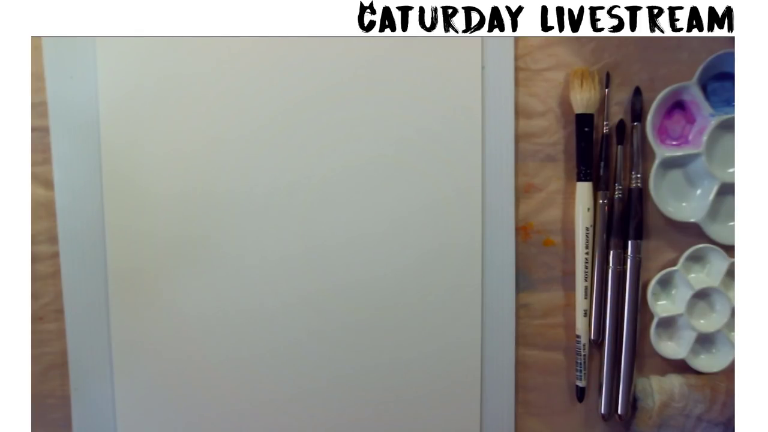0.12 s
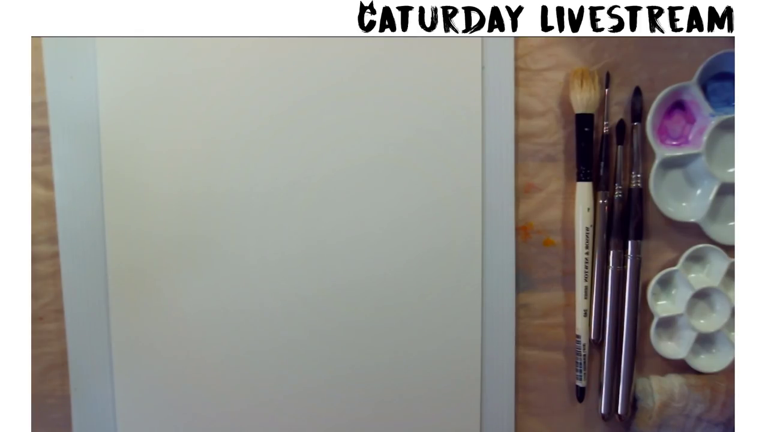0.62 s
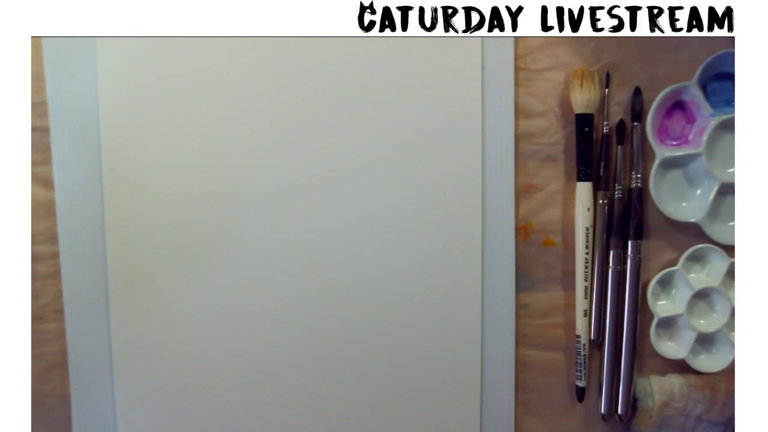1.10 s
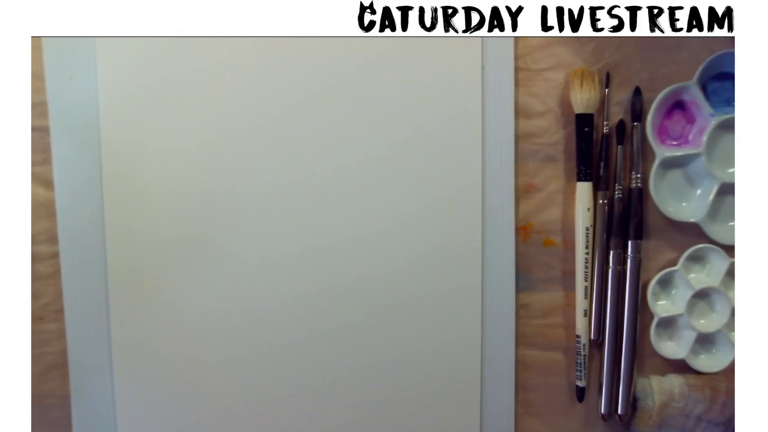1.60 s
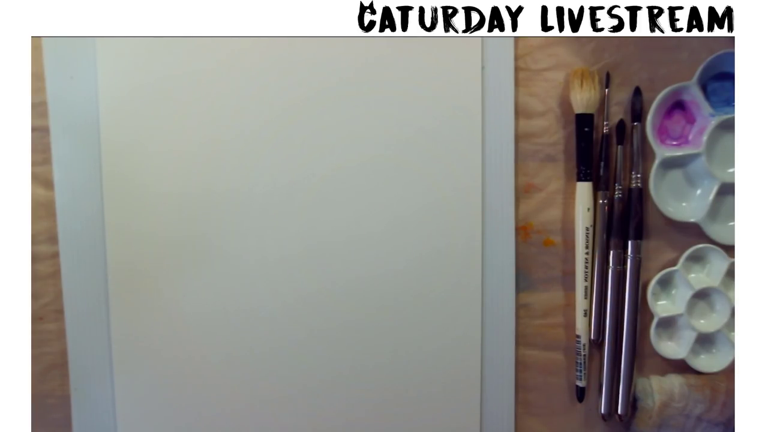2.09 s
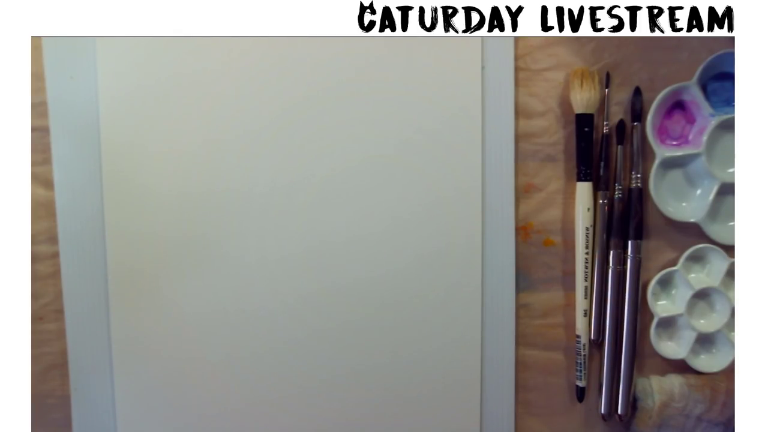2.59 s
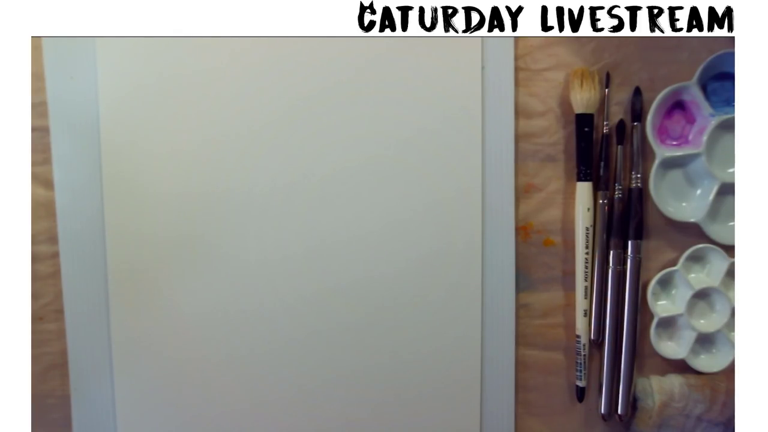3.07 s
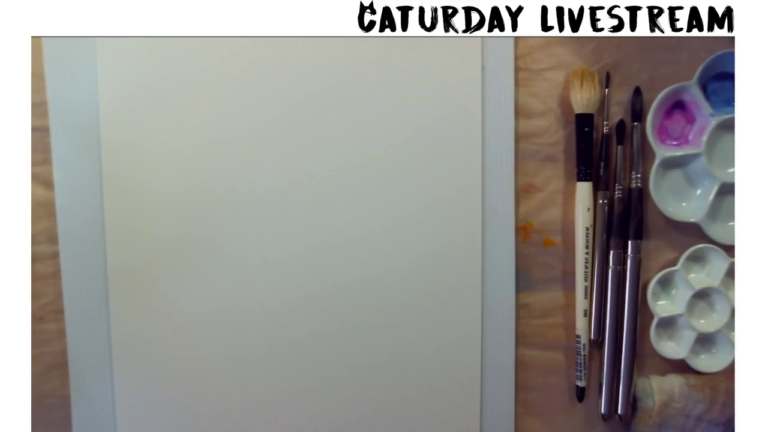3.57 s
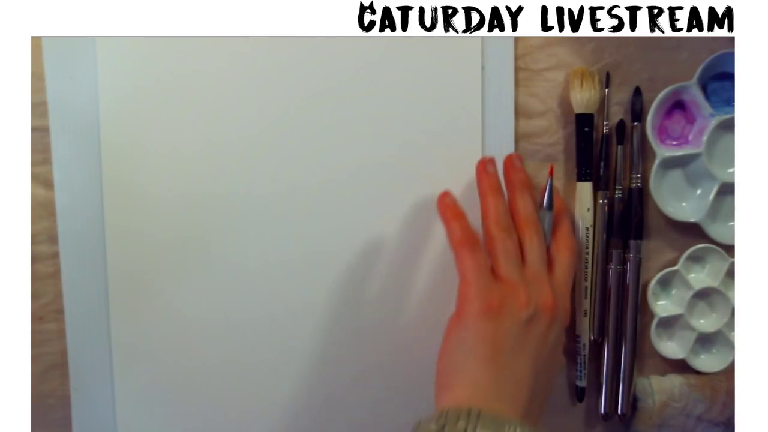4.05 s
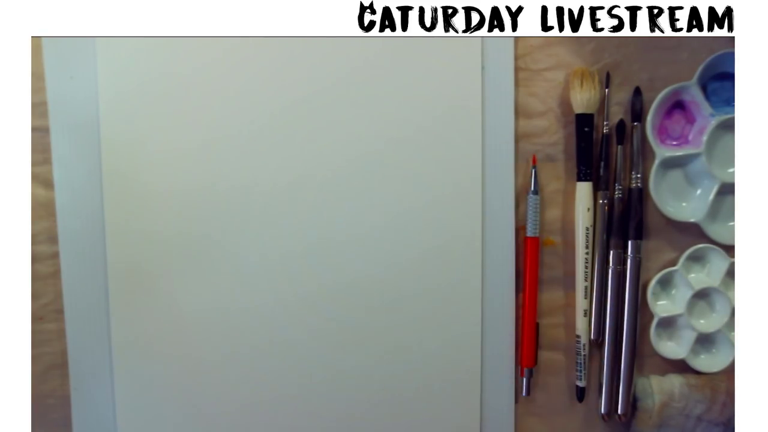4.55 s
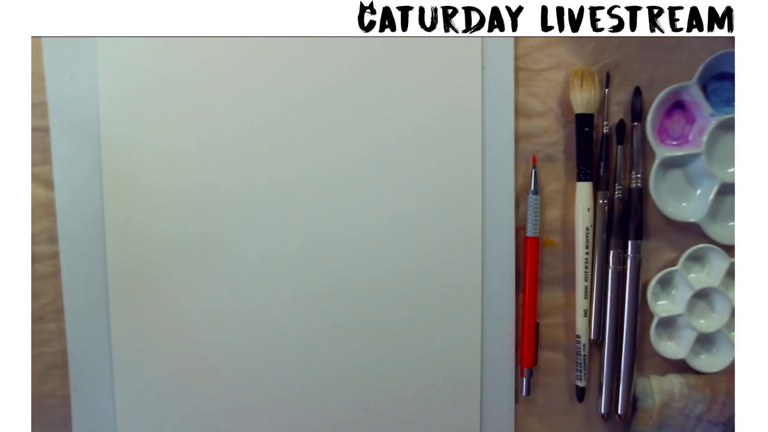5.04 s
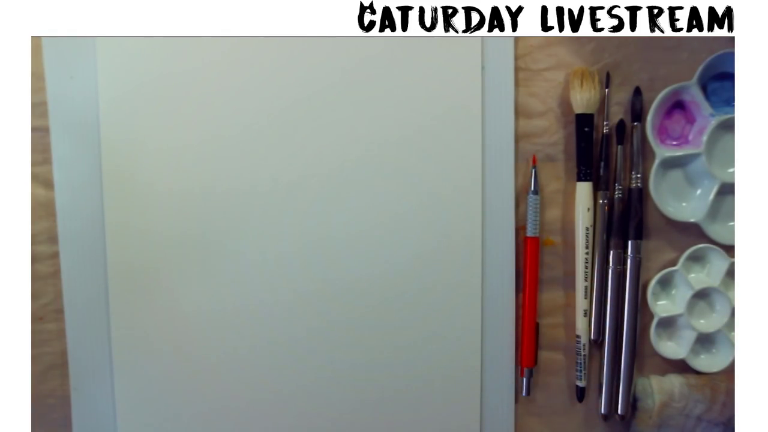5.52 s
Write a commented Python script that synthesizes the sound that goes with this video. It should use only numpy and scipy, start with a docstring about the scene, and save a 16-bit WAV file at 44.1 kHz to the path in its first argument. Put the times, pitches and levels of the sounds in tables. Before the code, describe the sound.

Soft hand and sleeve rubs on paper and wood, then a metal-tipped pencil clacks hard onto a desk, followed by scuffs and a paper push.

```python
"""A quiet room with a wooden desk: air and microphone hiss, a thin whine and a slowly swaying stand throughout.
First a sleeve and a hand slide over paper and desk: random friction grains excite wood modes and paper hiss.
Then a metal-tipped pencil is rattled, dropped hard on the wood and bounces: short contact pulses and snaps
set desk and metal modes ringing, and the loudest peaks overload the input.
After more scuffs and light knocks a sheet is pushed along, hissing, singing and booming in the hollow below."""
import sys
import numpy as np
from scipy import signal
from scipy.fft import rfft, irfft, next_fast_len
from scipy.io import wavfile

SR = 44100
rng = np.random.default_rng(int(sys.argv[2]) if len(sys.argv) > 2 else 0)


def voltage_ratio(decibels):
    """Convert decibels (scalar or array-like) to amplitude ratios, 20 dB per decade."""
    exponent = np.asarray(decibels, float) / 20
    return 10 ** exponent


def store_wav(level_fs):
    """Save 16-bit WAV to argv[1]."""
    pcm = np.round(np.clip(np.atleast_2d(level_fs), -1, 1) * 32767)
    wavfile.write(sys.argv[1], SR, pcm.T.astype(np.int16))


N = 249165  # length in samples

# spectrum of the steady air and microphone hiss: frequency_hz, relative_density_db (per Hz)
AIR_SPECTRUM = [(26, -32), (45, 0.5), (70, -30.5), (92, 2), (146, -2), (329, -18.5), (354, -9.5),
                (400, -19), (579, -17), (777, -24), (878, -22), (1270, -23), (1470, -23.5), (1660, -28.5),
                (15900, -37.5)]
# a distant appliance: pitch_hz, level_db, waver_t60_s
WHINE_TONES = [(1420, -77.5, 0.18), (1505, -69.5, 0.13)]
# motion of the microphone stand: time_s, sway_level_db, shiver_level_db (before SHIVER_TRIM_DB)
STAND_MOTION = [(0.0, -55, -55), (0.2, -42.5, -43), (0.5, -42.5, -47.5), (1.4, -53.5, -43.5),
                (3.0, -50, -52.5), (3.62, -41.5, -51), (3.74, -29.5, -50), (4.12, -40.5, -54),
                (4.19, -51.5, -24.5), (4.44, -28.5, -25.5), (4.78, -26, -34), (5.05, -27.5, -44),
                (5.32, -33, -40.5), (5.52, -34, -39), (5.65, -38, -59)]
# sleeve and hand resting and shifting lightly: time_s, desk_rub_db, paper_hiss_db
RESTING_CONTACT = [(0.0, -57, -64.5), (0.4, -62.5, -66.5), (0.74, -55.5, -59.5), (0.9, -57, -61),
                   (1.15, -62.5, -65), (1.7, -71, -73.5), (2.1, -64, -68), (2.3, -69, -81), (2.8, -68, -73),
                   (3.02, -65.5, -59.5), (3.56, -55, -62.5), (4.0, -63, -64), (4.38, -69.5, -68),
                   (4.68, -58, -63.5), (4.705, -48.5, -51), (4.81, -49, -46.5), (4.94, -49, -52.5),
                   (5.18, -49.5, -52), (5.25, -53, -57), (5.4, -55, -58), (5.65, -54, -68)]
# one long narrow slide of the hand: time_s, desk_rub_db
HAND_GLIDE = [(1.19, -72), (1.23, -58.5), (1.31, -54), (1.43, -56.5), (1.58, -59.5), (1.64, -69.5)]
# scuffs on the wood: peak_s, rise_s, fall_s, peak_drive_db, rub_pitch_hz
WOOD_SCUFFS = [(0.022, 0.12, 0.081, -30.5, 940), (0.177, 0.1, 0.056, -48.5, 1024),
               (0.451, .008, 0.11, -54.5, 1500), (0.634, 0.096, 0.092, -50.5, 1430),
               (3.0, 0.13, 0.23, -57, 1190), (3.17, 0.16, 0.37, -51, 1100),
               (4.488, 0.095, 0.085, -52.5, 1320), (4.826, 0.012, 0.11, -32.5, 1134),
               (4.856, 0.051, 0.077, -31, 1060), (5.002, 0.065, 0.065, -33, 1040),
               (5.157, 0.11, 0.041, -37, 795)]
# swishes of paper: peak_s, rise_s, fall_s, peak_drive_db, fine_hiss_db (above the usual share)
PAPER_SWISHES = [(0.0, 0.068, .11, -39, -1.5), (0.16, 0.065, 0.082, -59.5, 2), (0.452, 0.009, 0.14, -54, 1),
                 (0.634, 0.1, 0.1, -51, -4), (1.33, 0.1, 0.25, -61, 3), (3.18, 0.059, 0.28, -65, 0),
                 (3.335, .08, 0.11, -60.5, 2.5), (4.49, 0.0608, 0.078, -48, 0),
                 (4.822, 0.026, 0.058, -40.5, 0), (5.15, .2, .1, -50, 3)]
# the hollow under the desk answers a shift of weight: peak_s, rise_s, fall_s, peak_drive_db
HOLLOW_RUMBLES = [(0.02, 0.045, 0.028, -61), (0.22, 0.074, 0.12, -51), (0.75, 0.11, 0.26, -66),
                  (1.04, .3, 0.14, -53), (3.57, 0.12, 0.084, -54.5), (4.975, 0.059, .05, -40),
                  (5.21, 0.031, 0.066, -46)]
# the sheet is pushed along: time_s, desk_rub_db, paper_hiss_db, hollow_rumble_db
SHEET_PUSH = [(5.4, -70, -70, -68), (5.412, -46.5, -43.5, -39), (5.44, -42.5, -41, -47),
              (5.46, -34.5, -33.5, -22), (5.486, -27, -32.5, -21.5), (5.545, -27, -32, -34),
              (5.567, -30.5, -32.5, -38), (5.614, -43.5, -44.5, -49), (5.619, -33.5, -33.5, -53),
              (5.65, -38, -32.5, -41)]
# broad spectrum of rubbed wood: frequency_hz, relative_density_db (per Hz)
RUB_SPECTRUM = [(240, -41.5), (400, -19), (462, -40.5), (537, -14.5), (647, -16), (826, -1.5), (1180, -2.5),
                (1370, 16.5), (1620, 0), (2180, -3), (3000, -14.5), (3900, -49.5), (6600, -120)]
# spectrum of paper friction: frequency_hz, relative_density_db (per Hz)
HISS_SPECTRUM = [(1290, -40), (2200, -2), (2450, -6.5), (2770, -10.5), (3010, -6.5), (3740, -9.5),
                 (4160, -7), (4520, -5), (5380, -7), (6790, -8), (8700, -6), (9380, -8.5), (10800, -4),
                 (13400, -8), (15900, -14.5)]
# resonances with which the pushed sheet sings: pitch_hz, relative_level_db, t60_s
SHEET_MODES = [(2860, -6.5, 0.025), (4660, -4, 0.16), (7040, -8.5, 0.0055), (7700, -5, 0.0018),
               (9650, -7, 0.004), (11600, -13.5, .005), (13260, -7, 0.005)]
# resonances of the metal parts of the pencil: pitch_hz, relative_level_db, t60_s (capped when struck)
METAL_MODES = [(3680, -8, .022), (4300, -6, .02), (4600, -4, .025), (5300, -8, .015), (6290, -5, .02),
               (6900, -7, .018), (7320, -1, .024), (8400, -5, .015), (10000, -2, .024), (10850, -8, .014),
               (13000, -4, .018), (15000, -7, .014), (15450, -6, .016)]
# snaps of the pencil: start_s, drive_db, brightness_hz, metal_ring_db
PENCIL_TICKS = [(0.447, -40, 3240, -20), (3.8498, -34, 5800, -15.5), (4.0545, -24, 7150, -8.5),
                (4.0911, -33, 6140, -9), (4.093, -24.5, 4110, -10.5), (4.1021, -32.5, 9970, -9.5),
                (4.118, -28, 4970, -14), (4.1304, -35, 10000, -1), (4.1462, -34, 8870, -11.5),
                (4.1544, -16, 8000, -12.5), (4.1724, -15.5, 7440, -16.5), (4.1833, -3.5, 7920, -14),
                (4.186, 5.5, 9820, -16), (4.2214, -24, 6790, -21.5), (4.233, -8, 7570, -17.5),
                (4.238, -18.5, 7640, -29.5), (4.2491, -18.5, 8400, -30), (4.2668, -14.5, 7700, -26.5),
                (4.2954, -33.5, 9000, -23.5), (4.3041, -33, 7700, -7), (4.3235, -34.5, 9130, -24.5),
                (4.815, -31, 5920, -10), (4.8496, -21, 5050, -24), (4.87, -32, 7930, -20),
                (4.893, -25.5, 5920, -15), (4.97, -37, 12000, -23)]
# clearest modes of the desk: pitch_hz, relative_level_db, t60_s (free ringing; shortened by contact)
DESK_MODES = [(160, -41.5, 0.072), (222, -32, 0.038), (261, -12, 0.12), (335, -5, 0.066), (430, -15.5, .06),
              (543, -14.5, 0.064), (584, 6.5, 0.022), (725, -11.5, 0.051), (862, -9, 0.062),
              (949, -16.5, 0.15), (1022, -13.5, 0.36), (1072, -18, 0.14), (1138, -9, 0.019),
              (1233, 5, 0.033), (1408, -18, 0.029), (1633, 3, 0.02), (1831, -3, 0.03), (1977, 0, 0.061),
              (2196, -13, 0.11), (2330, -19.5, .04), (2500, -1.5, 0.07), (2850, 0, 0.045),
              (3435, -16, 0.13)]
# the many close desk modes and early echoes: frequency_hz, relative_density_db (per Hz)
DESK_TAIL_SPECTRUM = [(41, -36), (70, -16), (194, -11.5), (367, -7.5), (451, -23), (619, -19.5),
                      (1040, -2.5), (1760, -8), (1930, -4), (2310, -16.5), (3990, -20), (10300, -33),
                      (15900, -29.5)]
# blows on the desk: start_s, drive_db, contact_hz, longest_ring_t60_s, desk_ring_db
DESK_BLOWS = [(0.006, -43, 420, 0.11, -9), (4.093, -41, 2150, 0.11, 13.5), (4.1555, -28, 2500, 0.41, -4.5),
              (4.1847, 6.5, 1280, 0.13, 2.5), (4.1865, 4, 2140, 0.25, -4), (4.1928, -6, 1750, 0.12, -13),
              (4.3051, -31.5, 2023, 0.065, -1.5), (4.9509, -31, 1970, 0.028, -17),
              (5.0646, -28.5, 674, .04, -6), (5.1935, -26.5, 1550, 0.012, 6),
              (5.278, -35, 1000, 0.032, -14), (5.3099, -40, 2500, 0.022, 7.5), (5.466, -16, 335, 0.071, 0),
              (5.484, -17, 317, 0.11, 6.5), (5.5045, -22.5, 705, 0.061, -10),
              (5.533, -20, 1220, 0.057, -2.5)]

AIR_DB, SHIVER_TRIM_DB = -58, -5
ROOM_T60_S, ROOM_SHARE_DB = 0.32, -28  # decay at low frequency; gain of the room
WALL_CUT_HZ = 2300  # loss corner of an 8 ms delay
FADE_DB = 20  # drop over one rise or fall time
REST_HZ, PUSH_HZ, GLIDE_HZ = 1160, 1220, 1190  # rub pitches
# drop per octave away from the rub pitch; resting contact and push share the first
REST_FOCUS_DB, SCUFF_FOCUS_DB, GLIDE_FOCUS_DB = 9.5, 14.5, 30
FINE_DB, RUMBLE_DB = -5.0, -12  # drive of fine hiss against paper hiss, of hollow against resting rub
HEAVY_DB = -8  # blows driven above this keep their low bass
HEAVY_LOW_HZ, LIGHT_LOW_HZ = 43, 180  # lower band edges of heavy and light blows


def rms_one(x):
    """Normalisation: scale to rms 1."""
    return x / np.sqrt(np.mean(x ** 2) + 1e-20)


def in_time(rows):
    """Linear interpolation: columns of a table as curves over the samples."""
    s, *columns = np.transpose(rows)
    return [np.interp(np.arange(N) / SR, s, column) for column in columns]


def add(out, s, sound):
    """Superposition: mix a sound in at time s."""
    part = out[round(s * SR):][:len(sound)]
    part += sound[:len(part)]


def band(x, low_hz, high_hz, order=2):
    """Butterworth band-pass: a maximally flat band between two edges."""
    edges_hz = [low_hz, min(high_hz, .45 * SR)]
    return signal.sosfilt(signal.butter(order, edges_hz, "band", fs=SR, output="sos"), x)


def drift(rate_hz):
    """Low-passed noise: slow chance of spread 1, computed on every 40th sample."""
    r = np.exp(-80 * np.pi * rate_hz / SR)
    white = rng.standard_normal(N // 40 + 2002)
    slow = signal.lfilter([1], [1, -2 * r, r * r], white)[2000:]  # without the onset of the filter
    return np.interp(np.arange(N) / 40, np.arange(len(slow)), rms_one(slow))


def colour(x, spectrum):
    """Spectral shaping: weight a white input by a spectrum, interpolated in log frequency; rms 1."""
    hz, level_db = np.transpose(spectrum)
    log_hz = np.log(np.fft.rfftfreq(len(x), 1 / SR) + 1)
    gain_db = np.interp(log_hz, np.log(hz), level_db, left=-90, right=-90)
    return rms_one(irfft(rfft(x) * voltage_ratio(gain_db), len(x)))


def ring(clicks, hz, t60):
    """Damped resonance: a unit click starts a decaying sine of initial height 1."""
    r, w = voltage_ratio(-60 / (max(t60, .002) * SR)), 2 * np.pi * hz / SR
    return signal.lfilter([0, np.sin(w)], [1, -2 * r * np.cos(w), r * r], clicks + 1e-18)


def struck(modes, spread_db, longest_s, count):
    """Modal superposition: one strike gives each mode its own chance strength and exponential decay."""
    hz, level_db, t60 = np.transpose(modes)[:, :, None]
    t = np.arange(count) / SR
    fade_db = -60 * t / np.minimum(t60, longest_s)
    chance_db = spread_db * rng.standard_normal(hz.shape)
    return voltage_ratio(level_db + chance_db + fade_db) * np.sin(2 * np.pi * hz * t)


def burst(count, t60):
    """Exponential decay: a puff of noise that dies away."""
    return rng.standard_normal(count) * voltage_ratio(-60 * np.arange(count) / SR / t60)


def grains(per_s, spread_db, smooth):
    """Stick-slip friction: tiny catches of uneven size on a bed of smooth noise."""
    sizes = voltage_ratio(spread_db * np.minimum(rng.exponential(1, N), 5)) * rng.choice([-1, 1], N)
    catches = sizes * (rng.random(N) < per_s / SR)
    return rms_one(catches) + smooth * rng.standard_normal(N)


def room_tone():
    """Stationary noise: coloured air and microphone hiss, with narrow resonances as a wavering whine."""
    air = voltage_ratio(AIR_DB + 0.35 * drift(3.0)) * colour(rng.standard_normal(N), AIR_SPECTRUM)
    whine = 0
    for hz, level_db, t60 in WHINE_TONES:
        whine = whine + voltage_ratio(level_db) * rms_one(ring(rng.standard_normal(N), hz, t60))
    return air + whine


def stand():
    """Random vibration: the stand sways in a very low band of noise and shivers in a higher one."""
    def motion(low_hz, high_hz):
        """Narrow-band noise, after one second for the filter to settle."""
        return rms_one(band(rng.standard_normal(N + SR), low_hz, high_hz)[SR:])

    sway_db, shiver_db = in_time(STAND_MOTION)
    return voltage_ratio(sway_db) * motion(5, 11.34) + voltage_ratio(shiver_db + SHIVER_TRIM_DB) * motion(24, 40.5)


def room(x):
    """Reverberation by recirculation: fourteen feedback delays, duller on every round."""
    size = next_fast_len(N + SR)
    hz = np.fft.rfftfreq(size, 1 / SR)
    combs = 0
    for k, lag_s in enumerate(rng.uniform(0.0054, 0.02, 14)):
        loss = voltage_ratio(-60 * lag_s / ROOM_T60_S) / (1 + 1j * hz / WALL_CUT_HZ * lag_s / 0.008)
        loop = loss * np.exp(-2j * np.pi * hz * lag_s)
        combs = combs + (-1) ** k * loop / (1 - loop)
    return irfft(rfft(x, size) * combs, size)[:N]


def swells(rows):
    """Exponential growth and decay: power of each event, rising and falling steadily in dB."""
    s, rise_s, fall_s, peak_db = np.transpose(rows)[:4, :, None]
    late = np.arange(N) / SR - s
    return voltage_ratio(peak_db - FADE_DB * np.where(late < 0, -late / rise_s, late / fall_s)) ** 2


def pressure():
    """Addition of powers: drives of the sliding layers; pitch and focus follow the strongest contact."""
    rest, rest_hiss = voltage_ratio(np.array(in_time(RESTING_CONTACT))) ** 2
    pushing = np.arange(N) / SR > SHEET_PUSH[0][0]
    push, push_hiss, push_boom = voltage_ratio(np.array(in_time(SHEET_PUSH))) ** 2 * pushing
    scuffs, swishes = swells(WOOD_SCUFFS), swells(PAPER_SWISHES)
    scuff = scuffs.sum(axis=0)
    glide = voltage_ratio(in_time([(0, -90), *HAND_GLIDE, (N / SR, -90)])[0]) ** 2
    rub = rest + push + scuff + glide
    scuff_pitch = np.array(WOOD_SCUFFS)[:, -1] @ scuffs  # weighted by power
    pitch_hz = (REST_HZ * rest + PUSH_HZ * push + GLIDE_HZ * glide + scuff_pitch) / rub
    focus_db = (REST_FOCUS_DB * (rest + push) + SCUFF_FOCUS_DB * scuff + GLIDE_FOCUS_DB * glide) / rub
    hiss = rest_hiss + push_hiss + swishes.sum(axis=0)
    fine_swish = voltage_ratio(np.array(PAPER_SWISHES)[:, -1]) ** 2 @ swishes
    fine = voltage_ratio(FINE_DB) ** 2 * (rest_hiss + push_hiss + fine_swish)
    boom = voltage_ratio(RUMBLE_DB) ** 2 * rest + push_boom + swells(HOLLOW_RUMBLES).sum(axis=0)
    return pitch_hz, focus_db, *np.sqrt([rub, hiss, fine, boom])


def sliding():
    """Friction-driven resonance: grains ring the desk, the sheet hisses and sings, the hollow below booms."""
    pitch_hz, focus_db, rub, hiss, fine, boom = pressure()
    catches = grains(1200, 3, smooth=0.7) * voltage_ratio(0.8 * drift(60))
    # the place of contact favours the modes near the rub pitch
    wood, power = 0, 0
    for hz, level_db, t60 in DESK_MODES[4:]:
        near = voltage_ratio(.5 * level_db - focus_db * np.abs(np.log2(hz / pitch_hz)))
        wood = wood + near * rms_one(ring(catches, hz, 0.66 * t60))
        power = power + near ** 2
    wood = wood / np.sqrt(power)
    rubbing = rub * (0.71 * wood + voltage_ratio(-.6 * focus_db) * colour(catches, RUB_SPECTRUM))

    scrape = grains(5000, 2.3, smooth=1.0) * voltage_ratio(0.7 * drift(50))
    paper = colour(scrape, HISS_SPECTRUM)
    coarse = rms_one(band(paper, 2000, 9450))
    thin = rms_one(band(paper, 7400, 17640))
    # the stronger the hiss, the larger the share of singing, up to a limit
    song = sum(voltage_ratio(level_db) * rms_one(ring(scrape, hz, t60)) for hz, level_db, t60 in SHEET_MODES)
    singing = voltage_ratio(-3) * np.minimum(hiss / voltage_ratio(-30.5), 1)

    hollow = rms_one(band(catches, 215, 430, order=3))
    hollow = hollow + .9 * rms_one(band(ring(catches, 325, .045), 220, 450))
    return rubbing + hiss * (coarse + singing * song) + fine * thin + .5 * boom * hollow


def pencil():
    """Impulsive excitation: a dry bright snap, and brief metal modes, strongest near the snap in pitch."""
    out = np.zeros(N)
    for s, drive_db, bright_hz, ring_db in PENCIL_TICKS:
        near_db = -5.5 * np.abs(np.log2(np.array(METAL_MODES)[:, :1] / bright_hz))
        modes = struck(METAL_MODES, 4.5, .017, count=2000)
        metal = (voltage_ratio(ring_db + near_db) * modes).sum(axis=0)
        puff = burst(count=2000, t60=0.002) + voltage_ratio(-19) * burst(count=2000, t60=0.067)
        snap = band(puff, 0.59 * bright_hz, 1.7 * bright_hz)
        add(out, s, voltage_ratio(drive_db) * (metal + 1.05 * snap))
    return out


def blows():
    """Impact: one cycle of contact pressure, then clear modes over a dense tail; slow contacts sound dull."""
    out = np.zeros(N)
    t = np.arange(12000) / SR
    for s, drive_db, contact_hz, ring_s, ring_db in DESK_BLOWS:
        cycle = np.minimum(t * contact_hz, 1)
        contact = np.sin(2 * np.pi * cycle) * np.sin(np.pi * cycle)
        modes = struck(DESK_MODES, 1.5, ring_s, count=12000).sum(axis=0)
        tail = voltage_ratio(-14.5) * colour(rng.standard_normal(12000), DESK_TAIL_SPECTRUM)
        tail *= voltage_ratio(-60 * t / ring_s) * np.minimum(t / 0.0024, 1)  # builds up in 2.4 ms
        desk = band(voltage_ratio(-17.0) * modes + tail, 37, 2.0 * contact_hz, order=1)
        low_hz = HEAVY_LOW_HZ if drive_db > HEAVY_DB else LIGHT_LOW_HZ
        add(out, s, voltage_ratio(drive_db) * band(contact + voltage_ratio(ring_db) * desk, low_hz, SR / 2))
    return out


def scene():
    """Superposition: hits sound in the room; sliding, room tone and stand are added without it."""
    hits = blows() + pencil()
    echoes = voltage_ratio(ROOM_SHARE_DB) * room(band(hits, 390, 16000))
    return (hits + echoes + sliding() + room_tone() + stand())[None]


def roll_off(x):
    """The treble ends steeply here."""
    return signal.sosfilt(signal.butter(12, 16080, fs=SR, output="sos"), x)


def record(dry):
    """Overload: the input clips at full scale."""
    mix = np.clip(dry, -1, 1)
    return roll_off(mix)


dry = scene()
out = record(dry)
store_wav(out)
```